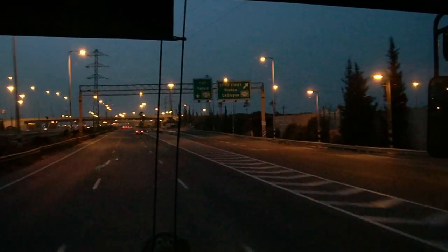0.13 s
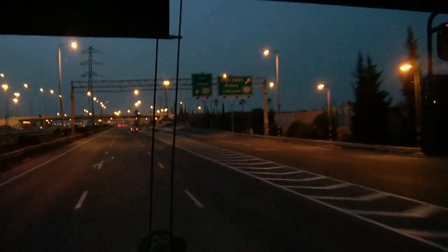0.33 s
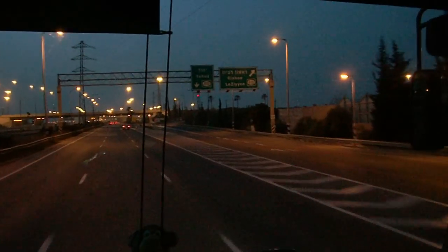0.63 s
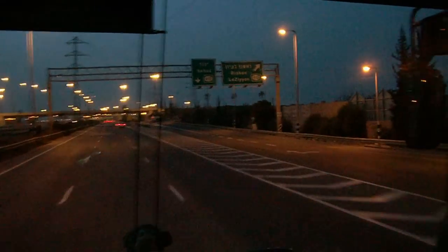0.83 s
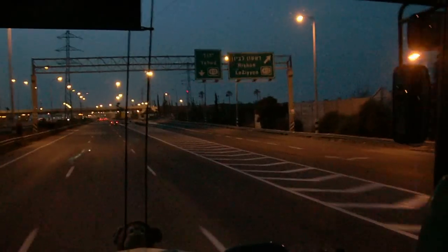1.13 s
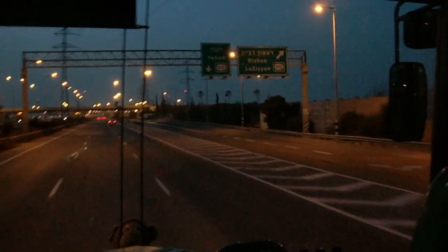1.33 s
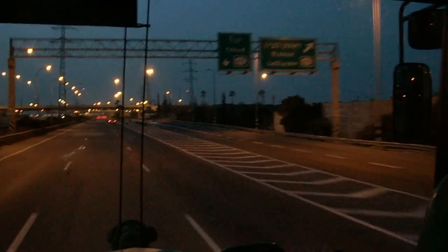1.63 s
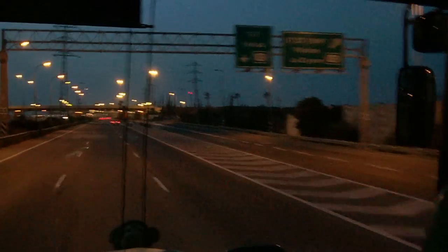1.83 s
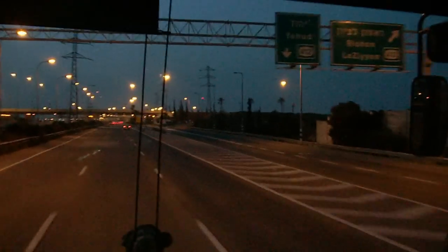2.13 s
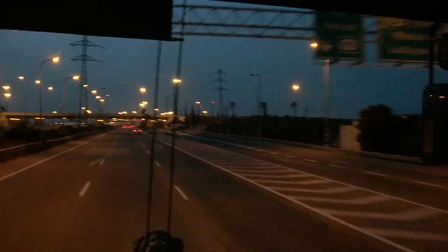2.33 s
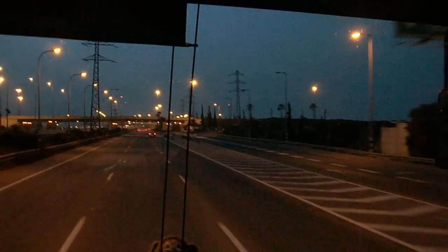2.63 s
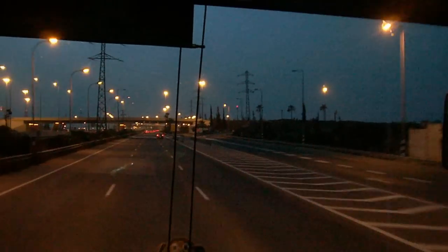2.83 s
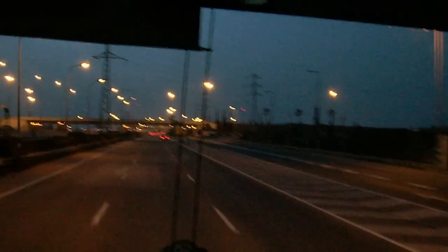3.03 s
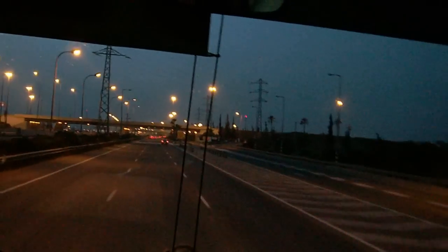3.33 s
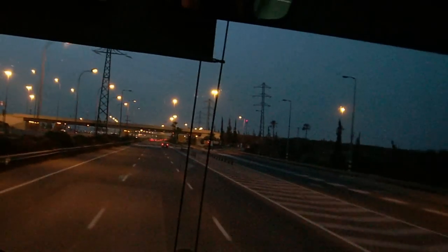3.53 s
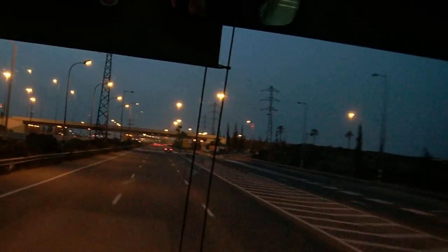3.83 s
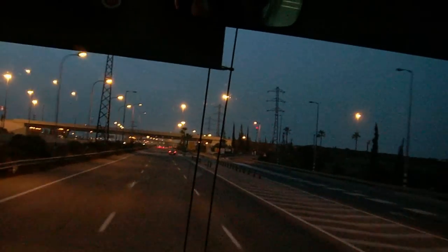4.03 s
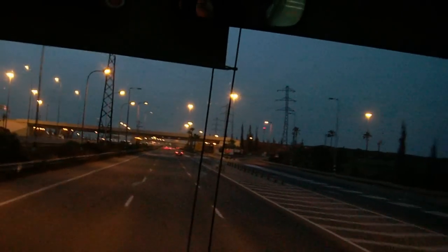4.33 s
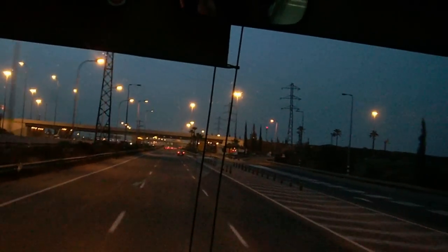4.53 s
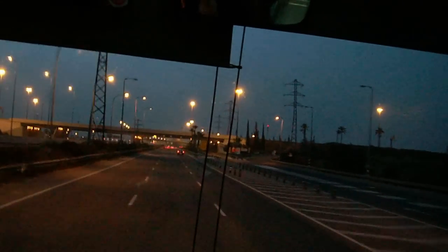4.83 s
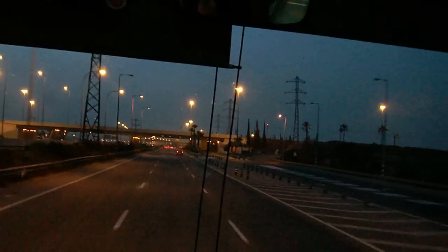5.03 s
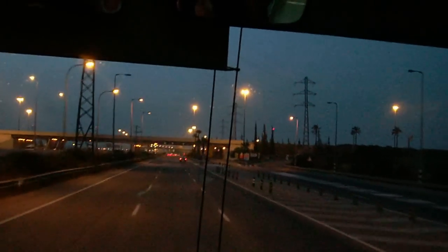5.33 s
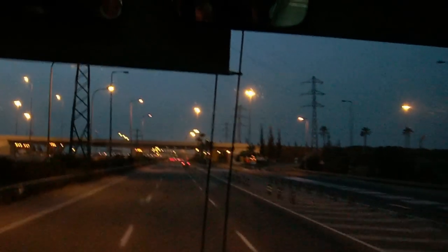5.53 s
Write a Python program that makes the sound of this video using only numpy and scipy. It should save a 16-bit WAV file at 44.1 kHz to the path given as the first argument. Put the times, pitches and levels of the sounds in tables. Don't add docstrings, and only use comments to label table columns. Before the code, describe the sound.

Close cabin sound from a small camera near the windscreen: low-frequency rumble dominates, bouncing irregularly over bumps. The engine holds one note without revving, while a roof panel sings softly in short spells. Dark tyre and air noise stays even. Over it lie quiet regular ratchet ticks, occasional tiny chirps from loose trim, mostly after three seconds, and constant faint electronic hiss and whine.

```python
import sys
import numpy as np
from scipy import signal
from scipy.fft import rfft, irfft, next_fast_len
from scipy.io import wavfile
from scipy.ndimage import uniform_filter1d, map_coordinates

SR = 44100
rng = np.random.default_rng(int(sys.argv[2]) if len(sys.argv) > 2 else 0)


def generate_wav(sig):
    pcm = np.round(np.clip(np.atleast_2d(sig).T, -1, 1) * 32767).astype(np.int16)
    wavfile.write(sys.argv[1], SR, pcm)


def volts_from_decibels(level):
    exponent = np.asarray(level, float) / 20
    return 10 ** exponent


N = 250488

# pitch in Hz, how far it wanders in Hz.
BODY_MODES = [
    (11.4, .3),
    (19.3, 1.2),
    (33.5, 1.8),
]
# time in seconds, level in dB.
AXLE_HOP = [(0.0, -25), (0.11, -27), (0.19, -47), (0.4, -21), (0.79, -22.5), (1.09, -65), (1.23, -26),
            (1.34, -26), (1.77, -7), (2.29, -17.5), (2.44, -12.5), (2.88, -19), (3.24, -9), (4.29, -22),
            (4.43, -30), (4.62, -21), (5.51, -25.5), (5.68, -30.5)]
# time in seconds, cabin boom in dB, floor in dB, tyre thump in dB.
BUMPS = [(.17, -25.5, -36, -35.5), (.3, -30, -27.5, -37), (.52, -25.5, -39, -37), (.66, -28.5, -38, -38),
         (.95, -26.5, -52, -36.5), (1.2, -29, -43, -36.5), (1.38, -22, -30, -32), (1.52, -23, -24.5, -31.5),
         (1.66, -30, -24, -34), (1.77, -21, -35, -44), (1.92, -21, -43, -42), (2.18, -36, -28, -44),
         (2.45, -26.5, -57, -40), (2.76, -28, -25.5, -45), (2.9, -20, -38, -37), (3.05, -20, -29, -32),
         (3.26, -14.5, -34, -29), (3.52, -18, -25, -31.5), (3.8, -45, -36, -36), (4.03, -24, -40, -33),
         (4.3, -36, -28, -34.5), (4.42, -38, -42, -32), (4.56, -23.5, -39, -34.5), (4.68, -22, -34, -34.5),
         (4.93, -23, -38.5, -38), (5.08, -27.5, -31, -32), (5.34, -44, -26.5, -33),
         (5.479, -33, -34, -34.5), (5.64, -28.5, -29, -32)]
# frequency in Hz, level in dB per Hz.
THUMP_COLOUR = [(35, -30), (43, -1), (49, 0), (58, -7), (70, -5), (82, -6), (95, -12.5), (108, -21),
                (130, -32), (200, -70)]
# time in seconds, pitch in Hz, level in dB.
ENGINE_DRONE = [(0, 158.2, -44), (1.4, 157.6, -43), (1.9, 157.8, -47.5), (2.3, 158.1, -45),
                (2.8, 157.8, -48.5), (2.97, 158.2, -52.5), (3.15, 157.6, -45), (4, 156.6, -43.5),
                (5, 157.6, -43), (5.68, 156.6, -44)]
# start in seconds, length in seconds, level in dB.
PANEL_SPELLS = [
    (.15, .85, -58.5),
    (1.3, 0.58, -60),
    (2.2, 0.7, -59.5),
    (3.17, 0.53, -56),
    (3.98, 0.64, -61.5),
    (5.0, 0.46, -54.5),
]
# time in seconds, level in dB, bright part in dB, main mode in dB.
CLOCK_STEPS = [(.087, -55.5, -3, 1), (.587, -52, 1, -5), (1.087, -55.5, -2, -8), (1.587, -53, -4, -7),
               (2.087, -53, -3, -2), (2.587, -54.5, -2, -12), (3.087, -55.5, 0, 1), (3.587, -56, 2, 9),
               (4.087, -58, 1, 11), (4.588, -51, -4, 0), (5.087, -56.5, 1.5, 6), (5.587, -55, 1, 3.5)]
# pitch in Hz, level in dB.
CLOCK_HOUSING = [(2783, 0), (2215, -2), (2365, -4.5), (2380, -11), (2550, -6), (2970, -13), (3105, -5.5),
                 (3380, -8), (3670, -9.5), (3760, -11), (4260, -21), (4320, -13), (5200, -26), (6600, -17)]
# frequency in Hz, level in dB per Hz.
PAWL_COLOUR = [(1500, -34), (2000, -6.5), (2400, -5.5), (3300, -15), (4600, -19.5), (7000, -26),
               (9000, -40)]
# time in seconds, pitch in Hz, level in dB, length in seconds.
TRIM_CHIRPS = [(0.174, 2130, -61, 0.071), (1.14, 2280, -64, 0.09), (2.497, 2420, -59, 0.057),
               (3.394, 2370, -60, 0.055), (3.537, 2120, -59, 0.061), (3.89, 2740, -62, 0.034),
               (4.157, 2760, -56, 0.057), (4.248, 2730, -64, 0.055), (3.64, 2470, -59, 0.049),
               (4.75, 2780, -64, 0.043), (5.257, 2820, -66, 0.05)]
# frequency in Hz, level in dB per Hz.
ROAR_COLOUR = [(60, -57), (110, 0), (140, -1.5), (190, -2.5), (250, -3), (270, -9), (292, -7.5),
               (325, -13.5), (450, -19), (650, -18.5), (1000, -24), (1700, -28.5), (3500, -34), (8000, -58)]
# frequency in Hz, width in Hz, level in dB.
CABIN_RESONANCES = [(681, 31, -79), (799, 47, -67), (878, 88, -64.5), (1285, 320, -63.5), (2185, 1180, -63),
                    (2383, 560, -63), (2700, 400, -68)]
# time in seconds, level in dB.
AIR_RUSH = [(0.0, -57.5), (0.12, -58.5), (1.71, -58), (2.24, -60.5), (2.82, -61.5), (3.23, -60.5),
            (3.49, -58.5), (4.32, -59.5), (4.78, -60), (5.24, -57.5), (5.55, -60.5), (5.68, -57)]
# frequency in Hz, level in dB per Hz.
HISS_COLOUR = [(1500, -27), (3000, -7), (4200, -3.5), (6000, -4), (8200, -5), (9600, -4), (11500, -6.5),
               (16400, -7)]
# multiple of its base pitch, busy level in dB, idle level in dB.
WHINE_OVERTONES = [(1, -87, -91), (3, -76, -81), (4, -69, -77), (5, -89, -93), (6, -87, -91), (7, -87, -91),
                   (8, -89, -92)]


def unit(x):
    return x / np.sqrt(np.mean(x ** 2) + 1e-20)


def curves(rows):
    s, *columns = np.transpose(rows)
    return [np.interp(np.arange(N) / SR, s, column) for column in columns]


def wobble(rate):
    points = rng.standard_normal(int(N * rate / SR) + 4)
    return map_coordinates(points, [np.arange(N) * rate / SR])


def tone(hz):
    return np.sqrt(2) * np.sin(2 * np.pi * np.cumsum(hz) / SR)


def noise(gain, patchy_db):
    z = signal.stft(rng.standard_normal(N + 8192), nperseg=512)[2]
    patches = uniform_filter1d(rng.standard_normal(z.shape), size=5, axis=0)
    patches = uniform_filter1d(patches, size=12, axis=1)
    x = signal.istft(z * volts_from_decibels(patchy_db * unit(patches)), nperseg=512)[1]
    m = next_fast_len(len(x))
    spectrum = rfft(x, m) * gain(np.fft.rfftfreq(m, 1 / SR))
    return unit(irfft(spectrum, m)[:N])


def shape(points):
    hz, db = np.transpose(points)
    return lambda f: volts_from_decibels(np.interp(np.log(f + 1), np.log(hz + 1), db, -120, -120))


def peak(hz, width):
    return lambda f: (f * width) ** 2 / ((hz * hz - f * f) ** 2 + (f * width) ** 2)


def jolts(levels_db, rise_s, rest_db):
    t = np.arange(0, N, 64) / SR
    bump_s = np.transpose(BUMPS)[0]
    since_kick = np.maximum((t[:, None] - bump_s) / rise_s + 1, 0)
    swell = since_kick * np.exp(1 - since_kick)
    power = swell ** 2 @ volts_from_decibels(levels_db) ** 2 + volts_from_decibels(rest_db) ** 2
    return np.interp(np.arange(N) / SR, t, 10 * np.log10(power))


def body():
    _, boom, floor, thump = np.transpose(BUMPS)
    hop_db = curves(AXLE_HOP)[0]
    boom_db = jolts(boom, rise_s=0.071, rest_db=-37)
    floor_db = jolts(floor, rise_s=0.054, rest_db=-37.5)
    thump_db = jolts(thump, rise_s=0.066, rest_db=-39)
    modes = np.zeros(N)
    for db, (hz, wander_hz) in zip([hop_db, boom_db, floor_db], BODY_MODES):
        modes += volts_from_decibels(db) * tone(hz + wander_hz * wobble(6))
    rumble = noise(shape(THUMP_COLOUR), patchy_db=-1.5)
    evenness = np.sqrt(np.abs(uniform_filter1d(rumble ** 2, size=SR // 12)) + 0.23)
    thumps = volts_from_decibels(thump_db) * unit(rumble / evenness)
    left_s = (N - np.arange(N)) / SR
    fade_out = np.sin(np.pi / 2 * np.clip(left_s / .03, 0, 1)) ** 2
    return fade_out * (modes + thumps)


def engine():
    hz, db = curves(ENGINE_DRONE)
    return volts_from_decibels(db + 0.44 * wobble(9)) * tone(hz)


def gear():
    hz = 391 - .25 * np.arange(N) / SR
    return volts_from_decibels(-59.5 + 0.72 * wobble(10)) * tone(hz)


def roof_panel():
    quiet_db, fade_s = -67, 0.11
    t = np.arange(N) / SR
    level_db = quiet_db + 1.5 + wobble(9)
    for start_s, long_s, db in PANEL_SPELLS:
        inside_s = np.minimum(t - start_s, start_s + long_s - t)
        level_db += (db - quiet_db) * np.clip(inside_s / fade_s + .5, 0, 1)
    return volts_from_decibels(level_db) * tone(303.8 + 1.1 * wobble(6))


def clockwork():
    out, t = np.zeros(N + SR), np.arange(SR // 8) / SR
    hz, level_db = np.transpose(CLOCK_HOUSING)
    swell = (1 - np.exp(-t / .002)) * volts_from_decibels(-60 * np.maximum(t - .02, 0) / .13)
    swell = swell * (1 - .3 * np.cos(2 * np.pi * 118 * t))
    scrape = np.pad(noise(shape(PAWL_COLOUR), patchy_db=1.5), (0, SR))
    for s, db, bright_db, main_db in CLOCK_STEPS:
        gain = volts_from_decibels(level_db + bright_db * (hz > 2900) + 2.5 * rng.standard_normal(len(hz)))
        gain[0] = volts_from_decibels(main_db)
        drift = np.cumsum(0.017 * rng.standard_normal((len(t), len(hz))), axis=0)
        ring = np.sin(2 * np.pi * (np.outer(t, hz) + rng.random(len(hz))) + drift) @ gain
        at = round(s * SR)
        buzz = volts_from_decibels(-5) * (ring + scrape[at:][:len(t)])
        out[at:][:len(t)] += volts_from_decibels(db) * swell * buzz
    return out[:N]


def trim():
    t = np.arange(N) / SR
    out = np.zeros(N)
    for s, hz, db, long_s in TRIM_CHIRPS:
        swell = np.exp(-((t - s) / (.5 * long_s)) ** 2)
        out += volts_from_decibels(db + 3 * wobble(90)) * swell * tone(hz + 60 * wobble(120))
    return out


def road_and_air():
    rush_db = curves(AIR_RUSH)[0]
    rush_db = rush_db - rush_db.mean()
    out = volts_from_decibels(-45 + 0.12 * wobble(2.2)) * noise(shape(ROAR_COLOUR), patchy_db=0.52)
    for hz, width_hz, db in CABIN_RESONANCES:
        out += volts_from_decibels(db + rush_db * hz / 2600) * noise(peak(hz, width_hz), patchy_db=1.5)
    return out


def camera_whine():
    base_hz, frames_per_s = 1966.78, 14.986
    t = np.arange(N) / SR
    frame = t * frames_per_s % 1
    reading = (frame > .115) & (frame < .59)
    busy = uniform_filter1d(reading * 1., size=120)
    out = np.zeros(N)
    for multiple, busy_db, idle_db in WHINE_OVERTONES:
        strength = volts_from_decibels(idle_db) + busy * (volts_from_decibels(busy_db) - volts_from_decibels(idle_db))
        out += strength * np.sqrt(2) * np.sin(2 * np.pi * round(multiple) * base_hz * t)
    return out


def camera_hiss():
    return volts_from_decibels(-61.5) * noise(shape(HISS_COLOUR), patchy_db=0.6)


def scene():
    coach = body() + engine() + gear() + roof_panel()
    return (coach + clockwork() + trim() + road_and_air())[None]


def band_limit(x):
    return signal.sosfilt(signal.butter(12, 15760, fs=SR, output="sos"), x)


def record(dry):
    mix = dry + camera_hiss() + camera_whine()
    return band_limit(mix)


dry = scene()
out = record(dry)
generate_wav(out)
```